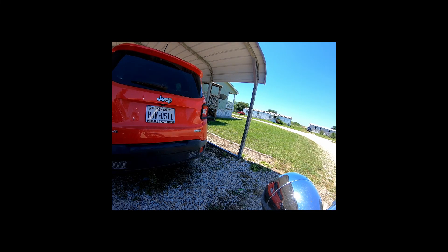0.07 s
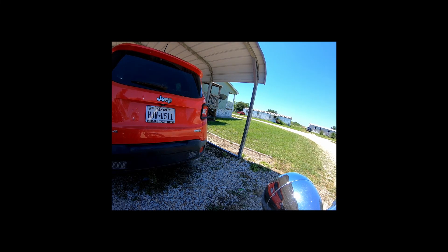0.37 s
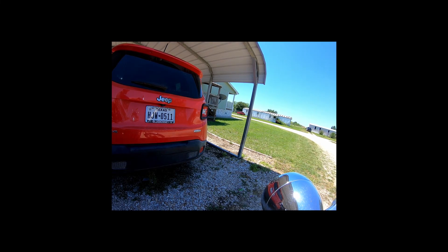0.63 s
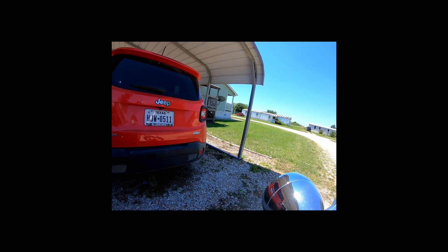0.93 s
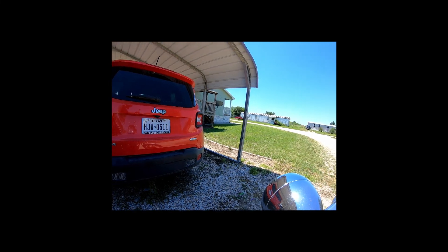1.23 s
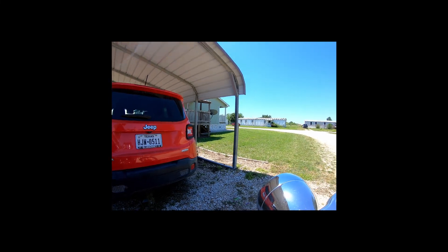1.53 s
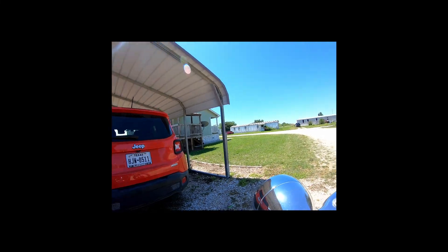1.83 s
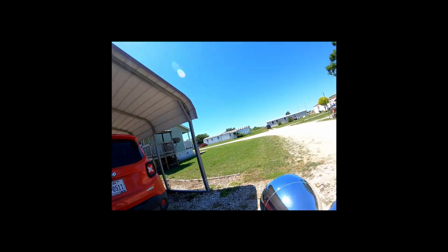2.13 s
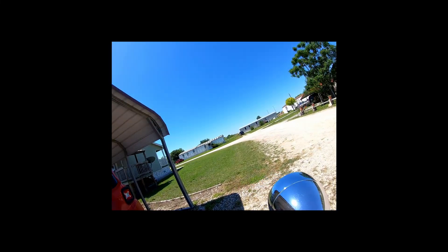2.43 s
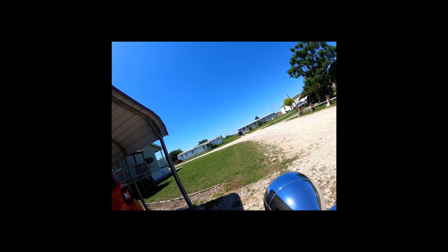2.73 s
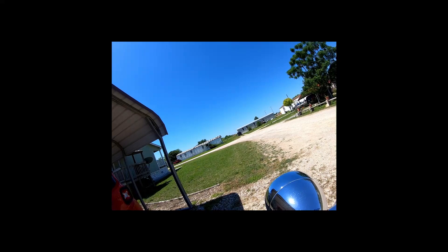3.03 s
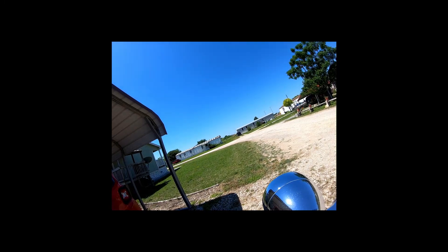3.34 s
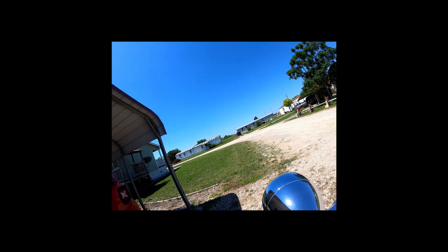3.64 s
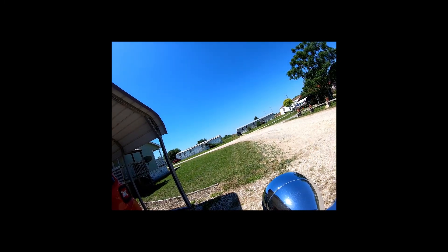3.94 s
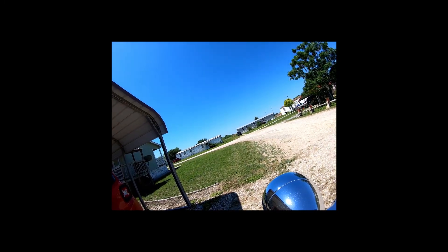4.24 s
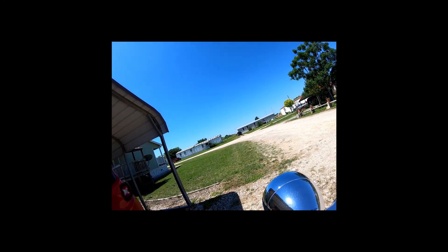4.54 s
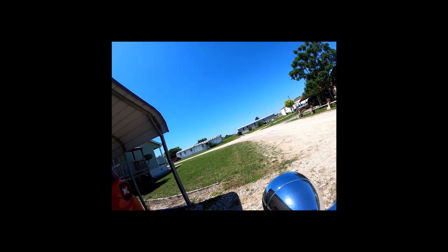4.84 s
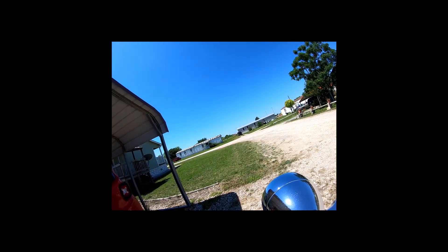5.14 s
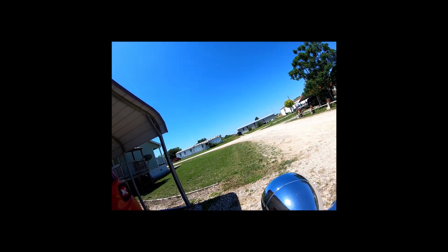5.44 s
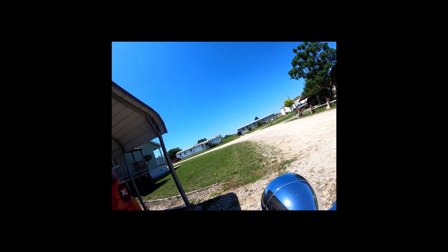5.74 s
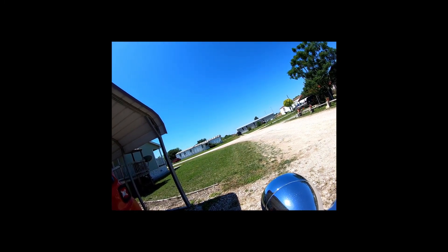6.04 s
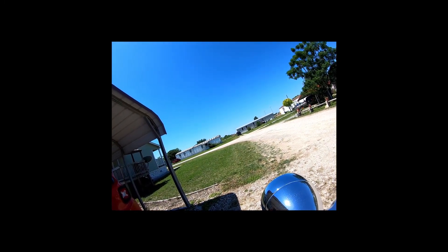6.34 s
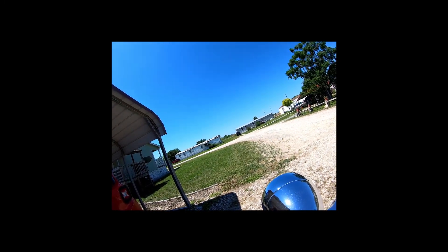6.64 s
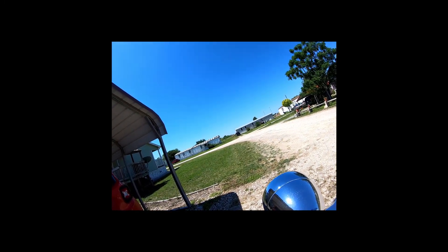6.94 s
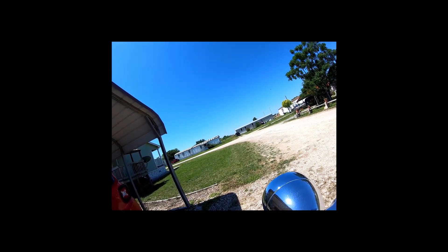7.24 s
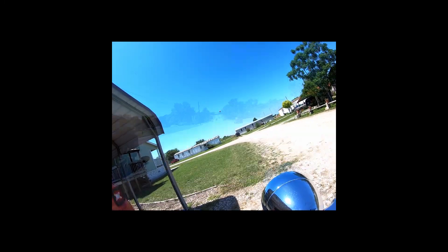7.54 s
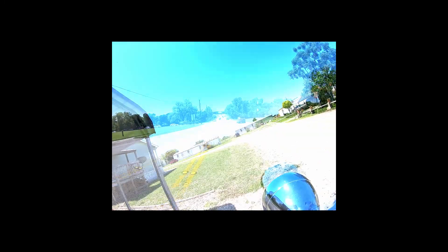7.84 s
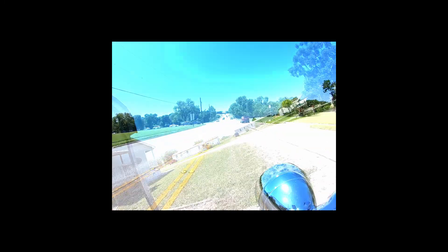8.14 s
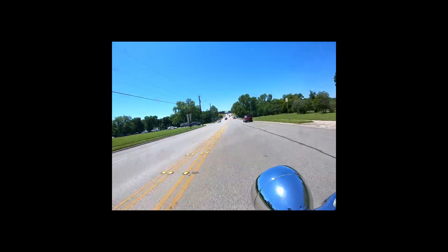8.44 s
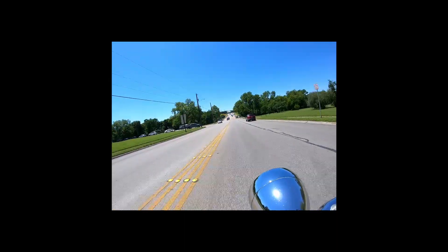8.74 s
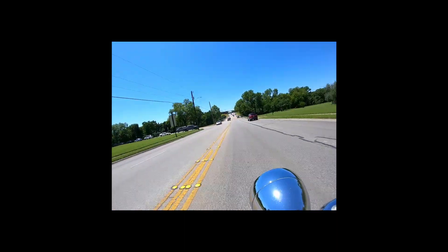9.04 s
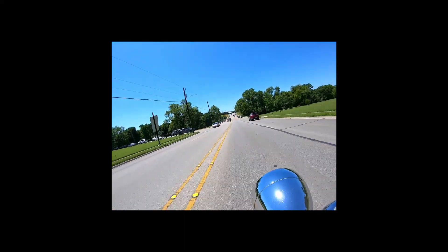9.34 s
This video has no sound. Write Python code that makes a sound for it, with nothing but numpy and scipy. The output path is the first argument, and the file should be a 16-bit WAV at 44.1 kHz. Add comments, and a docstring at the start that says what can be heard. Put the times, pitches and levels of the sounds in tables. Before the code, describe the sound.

Heard close from above the handlebar, a large motorcycle engine has just started and stumbles along with deep booms, soft chuffs and exhaust cracks, over clattering valves and small clanks. Two quick revs die back almost to a stall, then a third leads into a quicker idle. Near the end, the short carport reflections give way to the open road, where the engine drones evenly under rushing, gusting wind.

```python
"""A pop and a boom: a big V-twin motorcycle has just caught under a carport, its starter coasting down.
It lopes unevenly, nearly stalls, is blipped three times and takes up a fast idle. Each firing is a
boom that glides upward in the exhaust, a hollow thud in the muffler and, on a hard burn, a bark.
One microphone sits close, above the handlebar. At about 8 s the carport blends into the open road:
the same engine cruising, with wind on the microphone."""
import sys
import numpy as np
from scipy import signal
from scipy.fft import rfft, irfft, next_fast_len
from scipy.io import wavfile

SR = 44100
rng = np.random.default_rng(int(sys.argv[2]) if len(sys.argv) > 2 else 0)


def put_to_file(sound):
    """Save the sound as 16-bit audio at rate SR, in the file named by the first command-line argument."""
    columns = np.atleast_2d(sound).T  # one column per channel
    safe = np.clip(columns, -1, 1)
    whole_steps = np.round(safe * 32767)
    wavfile.write(sys.argv[1], SR, whole_steps.astype(np.int16))


N = 413658

# hard burns of the stumbling idle, blips and fast idle: (time [s], thud [dB], bark [dB], gas crack [dB])
POPS = [(.002, -22, -41, -29), (0.236, -34, -22, -32), (.336, -28, -21.5, -40), (0.396, -47, -15, -34.5),
        (.634, -29, -24.5, -39.5), (.866, -47, -20.5, -39.5), (0.9484, -23, -26, -38),
        (1.003, -26, -36, -49), (1.2766, -26, -22.5, -38.5), (1.342, -31, -21, -32.5),
        (1.59, -18.5, -21, -36), (1.759, -27, -40, -39.5), (1.832, -22, -19.5, -34.5),
        (1.915, -19.5, -25, -37), (1.989, -29.5, -36, -43.5), (2.2692, -20.5, -44, -38),
        (2.3367, -32, -30, -39.5), (2.494, -31.5, -25.5, -41.5), (2.5894, -20, -39, -40.5),
        (2.949, -26.5, -46, -41.5), (3.013, -28, -27, -34.5), (3.272, -18, -36, -35.5),
        (3.494, -24, -28, -38), (3.5854, -19, -33, -39), (3.652, -33.5, -47, -53), (3.933, -11, -23, -31),
        (4.061, -10.5, -21, -30), (4.113, -21, -21, -32), (4.33, -21.5, -51, -64), (4.5, -12, -12.5, -29.5),
        (4.5617, -9, -17, -28), (4.598, -10.5, -14.5, -28.5), (4.64, -9.5, -15, -33),
        (4.666, -21, -18, -34.5), (4.933, -13.5, -13.5, -29.5), (4.97, -10, -18, -33),
        (4.9933, -14, -12.5, -29.5), (5.0247, -11, -15, -33), (5.047, -16.5, -20, -33.5),
        (5.92, -23.5, -43, -31.5), (6.23, -23, -49, -40.5), (6.29, -29, -31, -40.5),
        (6.3704, -22, -60, -42.5), (6.526, -21.5, -37, -44.5), (6.584, -28, -30, -36),
        (6.666, -16.5, -30, -37.5), (6.721, -33, -24, -37), (6.7871, -15, -27, -34),
        (6.832, -14.5, -13.5, -31.5), (6.8806, -8.5, -18, -30), (6.9132, -18, -12, -32),
        (6.9521, -14, -25, -32), (7.263, -19, -27, -38), (7.301, -24, -20.5, -37),
        (7.342, -16.5, -30, -36.5), (7.376, -17.5, -19, -36.5), (7.4161, -15, -25, -34.5),
        (7.447, -15.5, -18, -38), (7.49, -19, -24, -38), (7.522, -20.5, -19, -34.5),
        (7.567, -13, -24.5, -36), (7.5991, -21.5, -17.5, -35.5), (7.643, -19, -32, -37),
        (7.679, -19.5, -22.5, -36.5), (7.722, -15.5, -30, -36), (7.76, -17, -22.5, -34.5),
        (7.8084, -20, -21, -35.5), (7.8445, -21, -19.5, -36), (7.891, -20.5, -22.5, -35.5),
        (7.928, -18.5, -21, -32.5), (7.978, -22.5, -22.5, -35)]
# soft chuffs of the loping idle: (time [s], boom [dB], thud [dB])
CHUFFS = [(.055, -14.5, -29), (0.184, -16, -22), (.48, -15.5, -40), (.548, -16, -48), (.7, -19, -34),
          (.785, -16.5, -45), (1.096, -17, -41), (1.182, -23, -44), (1.426, -20, -38), (1.493, -19.5, -34),
          (1.668, -18, -35), (2.073, -19, -31), (2.154, -21, -37), (2.422, -15.5, -29.5),
          (2.662, -17.5, -32.5), (2.748, -19.5, -33), (2.825, -25.5, -50), (3.1, -20.5, -32),
          (3.163, -17.5, -33), (3.345, -19, -40), (3.428, -19, -31.5), (3.738, -20, -35), (3.81, -29, -59),
          (4.001, -23, -43), (4.174, -16, -37), (4.228, -14, -28), (4.283, -17, -37), (4.392, -25, -32),
          (4.44, -17.5, -22), (5.982, -16, -30), (6.073, -22, -33), (6.148, -19, -25), (6.44, -18, -35)]
# even running: (time [s], engine speed [cycles/s], thud [dB], bark [dB], gas crack [dB])
BETWEEN_BLIPS = [(4.705, 15, -22, -40, -41.5), (4.91, 13, -25.5, -55, -46)]
RUN_DOWN = [(5.07, 23.6, -9.5, -27, -46), (5.12, 21.6, -33, -47, -42), (5.201, 22, -27, -47, -44),
            (5.299, 18.9, -27.5, -42, -45), (5.5, 15, -26, -46, -49), (5.601, 13.5, -33, -38, -48),
            (5.699, 12.3, -19, -50, -43.5), (5.88, 10.1, -31, -53, -59)]
AFTER_BLIP = [(6.99, 13, -27, -44, -41), (7.235, 12, -24.5, -56, -56)]
CRUISE = [(8.015, 15.5, -22, -40, -44), (8.1, 15.3, -24.5, -31.5, -45), (8.699, 16.8, -31, -34.5, -44),
          (9, 16.4, -26.5, -35, -42), (9.38, 16.1, -21, -41, -37.5)]
# added to the first cylinder, taken from the second: (boom [dB], thud [dB], bark [dB], gas crack [dB])
CYLINDER_CONTRAST = [0.81, 0.61, -2, -0.6]
# twist grip: (time [s], opening [0-1])
THROTTLE = [(0, 0.17), (3.9, 0.18), (4.45, 0.72), (4.6, 0.5), (4.72, 0.55), (4.88, 0.23), (5.03, 0.86),
            (5.1, 0.07), (5.6, 0.4), (6.6, 0.37), (6.9, 0.78), (7.9, 1), (8.3, 0.9)]
# strength of the pipe boom: (time [s], level [dB])
BOOM_LEVEL = [(0, -18), (1.2, -18), (2.3, -17.5), (3.7, -18.5), (4.6, -17), (5.03, -14.5), (5.1, -29),
              (5.48, -21), (5.7, -18.5), (6.2, -18.5), (6.8, -17), (7.4, -14.5), (8.0, -15.5),
              (8.25, -26.5), (9.38, -25)]
# strokes that whoop, climbing higher and swelling to their end: (time [s])
WHOOPS = [2.337, 3.013, 3.163, 3.345, 5.982]
# resonances of the bike's parts: (frequency [Hz], level [dB], t60 [s])
MUFFLER_MODES = [(180.4, 1, 0.051), (254.8, -1, 0.059), (275.7, 1, 0.076), (312, 1, 0.036),
                 (396, -8.5, 0.027)]
PIPE_MOUTH_MODES = [(430, -8, .016), (545, -6, .016), (616, -2, .018), (725, 4, .03), (810, 2, .026),
                    (930, -7, .014), (1100, -7, .03)]
FIN_MODES = [(1778, 7.5, 0.024), (1957, 0, .06), (2258, 2.5, 0.046), (2600, -6, 0.043), (2887, -4, 0.046),
             (3180, 0.5, .04), (3460, -6, 0.028)]
AIR_BOX_MODES = [(150.6, 2.5, 0.11), (248, 10.4, 0.031), (293.5, 1.2, 0.16)]
LEVER_MODES = [(2440, -1, 0.085), (3920, -10, 0.09), (4040, -1, 0.076), (5520, -12, 0.05),
               (7520, -19, 0.088)]
# noise colours of exhaust, machinery and wind: (frequency [Hz], relative density [dB])
RUMBLE_COLOUR = [(18, -6.5), (32, -11.5), (50, 8), (70, 9), (100, -14), (150, -30.5), (300, -49)]
BLAST_COLOUR = [(450, -4.5), (650, 7.5), (900, 1), (1150, -2), (1600, -24)]
GAS_COLOUR = [(250, 5), (450, 12.5), (800, 8.5), (1100, 1), (1450, -2.5), (2000, -0.5), (2900, -3.5),
              (4200, -11.5), (7000, -21), (11000, -29), (15000, -45)]
CLATTER_COLOUR = [(300, 2.5), (400, -11.5), (520, -5), (750, -4.5), (1000, -12), (1400, -13.5), (2000, -8),
                  (2800, -17), (4000, -31.5), (5500, -35), (8000, -41.5), (10500, -55.5), (12500, -62.5)]
WHIRR_COLOUR = [(1500, 9.5), (3000, -8), (4500, -4), (6000, -5.5), (7800, -6.5), (9000, -19), (11000, -17),
                (13000, -42.5)]
TICK_COLOUR = [(1000, -6), (2400, -4.5), (4200, -10.5), (8000, -16.5), (11000, -21), (15000, -41)]
BUFFET_COLOUR = [(15, -13.5), (28, 7.5), (50, 1.5), (100, 5), (200, 1.5), (300, -3), (450, -17), (800, -63)]
RUSH_COLOUR = [(250, 5), (500, -1.5), (800, -6), (1250, -11), (2000, -15), (3000, -16.5), (4200, -23.5),
               (5400, -28.5), (6300, -36), (8300, -37.5), (10300, -50.5), (11700, -73)]
# reflections from the ground, the parked car and the roof: (delay [s], relative level [dB])
ECHOES = [(.0047, -35), (0.0128, -10.5), (0.02, -21.5), (0.03, -25.5), (0.047, -9.5)]
# valve gear and primary drive: (time [s], low clatter [dB], high clatter [dB])
RATTLE = [(0.0, -22.5, -30), (0.71, -36.5, -45), (2.65, -37, -45), (2.72, -40.5, -48), (3.75, -35, -43.5),
          (3.9, -36, -44.5), (3.97, -37.5, -44.5), (4.52, -32, -41), (4.66, -29.5, -40.5),
          (5.08, -29, -37.5), (6.06, -38, -46.5), (6.62, -39.5, -48.5), (6.82, -26.5, -36.5),
          (7.29, -34.5, -44), (7.44, -29, -39), (8.0, -40.5, -58)]
# the starter spinning down: (time [s], pitch [Hz], whine [dB], whirr [dB])
STARTER = [(0, 4270, -49, -44), (.2, 4630, -56, -42.5), (.45, 4050, -61, -53), (.6, 3600, -60, -52),
           (.72, 3080, -60, -56), (.95, 2430, -57, -55.5), (1.2, 1870, -67, -79), (1.5, 1520, -100, -100)]
# hum of the primary chain: (time [s], pitch [Hz]) and (time [s], level [dB])
CHAIN_PITCH = [(.25, 475), (.42, 568.5), (.58, 496), (.81, 425), (.98, 560), (1.24, 450.5), (1.37, 558.5),
               (1.53, 425), (1.63, 548.5), (1.8, 415), (1.96, 556), (2.08, 491), (2.33, 515), (2.43, 471.5),
               (2.53, 520), (2.73, 483), (2.84, 410.5), (3.05, 575), (3.13, 498.5), (3.45, 466.5),
               (3.62, 613.5), (3.85, 469), (4, 593), (4.25, 605)]
CHAIN_LEVEL = [(0, -35.5), (.8, -41.5), (1.1, -44), (2.5, -40.5), (3.7, -43.5), (3.88, -57), (4.05, -37),
               (4.3, -46), (4.5, -93)]
# loose shields and brackets: (time [s], pitch [Hz], level [dB], t60 [s])
CLANKS = [(.044, 1960, -44, 0.068), (0.398, 2047, -23, 0.068), (0.867, 2560, -32, 0.058),
          (.885, 2290, -45.5, .45), (1.34, 2910, -33, .06), (1.592, 3500, -40, .06),
          (1.831, 2810, -29.5, 0.069), (1.915, 2455, -32, 0.093), (2.271, 1317, -38, .08),
          (2.398, 1960, -42, 0.13), (2.706, 2000, -45, 0.15), (2.911, 4030, -45, .12),
          (2.95, 1410, -40, 0.25), (2.953, 4000, -51, 0.17), (3.012, 3860, -46, .08),
          (3.046, 2540, -39, 0.11), (3.289, 2345, -36, 0.11), (5.927, 1600, -32, 0.15),
          (6.232, 2930, -44, .08), (6.245, 2096, -41, .08), (6.371, 2067, -40, .08),
          (6.726, 1790, -35, 0.076), (6.786, 3253, -41, .08), (6.833, 1765, -22, 0.064),
          (7.376, 1780, -23, 0.049), (7.68, 1732, -32, 0.073)]
# extra intake gulps as the throttle is nudged open: (time [s], level [dB])
GULPS = [(0.094, -22), (2.776, -20), (5.65, -17), (6.42, -26), (5.813, -14.5), (7.209, -11)]
# small metal contacts: (time [s], level [dB])
TICKS = [(2.537, -38), (2.753, -33), (2.773, -25.5), (2.821, -48), (2.869, -57), (2.923, -42), (2.953, -41),
         (2.991, -44), (3.053, -39), (3.101, -49), (3.15, -55), (3.802, -36), (3.819, -34), (6.207, -40)]
# gear whine: (time [s], pitch [Hz], level [dB])
GEARS = [(4.3, 1702, -77), (5.2, 1807, -47.5), (5.8, 1698, -57), (6.5, 1695, -54), (7.3, 1770, -50.5),
         (7.9, 1800, -77), (8.3, 1790, -68)]
# exhaust drone at speed: (time [s], level [dB])
DRONE_LEVEL = [(5.04, -38), (5.08, -15), (5.25, -15.5), (5.5, -18), (5.62, -19.5), (5.75, -34), (8.0, -38),
               (8.2, -23.5), (8.7, -23), (9.38, -22)]
# orders in the drone: (multiple of the engine cycle, throttle shut [dB], under load [dB])
DRONE_ORDERS = [(3, -16, -4), (4, -6, -7), (5, -2.5, 1), (6, -6.5, -4), (7, -7.5, 1.5), (8, -8, 0),
                (9, -10.5, -2), (10, -24, -10), (11, -17, -18), (12, -27, -4.5), (13, -15, -11),
                (14, -16.5, -10), (16, -21, -9)]
# pipe resonances that lift each order passing through: (frequency [Hz], half-width [Hz], lift [dB])
PIPE_PEAKS = [(85.4, 15, 5.5), (280, 34, 5.5)]
# riding wind at the microphone: (time [s], buffeting [dB], rush [dB])
WIND = [(0, -92.5, -96), (7.95, -71.5, -65.5), (8.0, -22, -30), (8.1, -23.5, -28), (8.26, -16, -25.5),
        (8.5, -23.5, -28), (8.75, -17, -24.5), (8.95, -19, -27), (9.15, -22.5, -28), (9.38, -21.5, -28.5)]

SECOND_CYLINDER = .428   # share of a cycle by which the second cylinder follows the first
CHUFF_BARK_DB, CHUFF_CRACK_DB = -51, -53
WHOOP_LIFT_HZ, WHOOP_SWELL_DB = 31.9, 4
BOOM_LAG_S = 0.0011   # the bass leaves the pipe just after the snap
LOAD_CLEARS_DB = 5   # an open throttle sweeps the tumbling gas out of the pipe
CARPORT_UNTIL_S, ROAD_FROM_S = 7.95, 8.25


def from_db(db):
    """Decibels to gain."""
    return 10 ** (np.asarray(db) / 20)


def unit_power(x):
    """Scale to an RMS of 1."""
    return x / np.sqrt(np.mean(x ** 2) + 1e-20)


def in_time(rows):
    """Each column of a curve at every sample."""
    s, *columns = np.transpose(rows)
    return [np.interp(np.arange(N) / SR, s, c) for c in columns]


def value_at(times, curve):
    """A two-column curve at the given times."""
    return np.interp(times, *np.transpose(curve))


def add(out, s, sound):
    """Mix a sound in at a time."""
    i = max(int(s * SR), 0)
    out[i:i + len(sound)] += sound[:max(N - i, 0)]


def butter(x, hz, kind):
    """Second-order low- or high-pass."""
    return signal.sosfilt(signal.butter(2, hz, kind, fs=SR, output="sos"), x)


def drift(rate_hz):
    """Slow random wander of spread 1."""
    return unit_power(butter(rng.standard_normal(N + SR), rate_hz, "low")[SR:])


def noise(colour):
    """Unit noise with a given spectrum, falling steeply beyond both ends."""
    hz, db = np.transpose(colour)
    size = next_fast_len(N)
    bins = np.maximum(np.arange(size // 2 + 1) * SR / size, 1)
    skirts = np.minimum(bins / hz[0], 1) ** 2 * np.minimum(hz[-1] / bins, 1) ** 20
    gain = from_db(np.interp(np.log(bins), np.log(hz), db)) * skirts
    return unit_power(irfft(rfft(rng.standard_normal(size)) * gain, size)[:N])


def strike(times, levels_db, modes, vary_db, detune):
    """Each blow rings all modes, with strengths and pitches of its own."""
    hz, db, t60 = np.transpose(modes)[:, :, None]
    out, t = np.zeros(N), np.arange(SR // 8) / SR
    dying = (-1) ** np.arange(len(hz))[:, None] * from_db(db - 60 * t / t60)
    for s, level_db in zip(times, levels_db):
        strength, pitch = rng.standard_normal((2, len(hz), 1))
        rings = dying * np.sin(2 * np.pi * hz * (1 + detune * pitch) * t)
        add(out, s, np.sum(from_db(level_db + vary_db * strength) * rings, axis=0))
    return out


def bursts(times, levels_db, rise, decay, tail_db, tail_decay):
    """Envelope of puffs that swell, die quickly and leave a faint tail; time constants in seconds."""
    power, t = np.zeros(N), np.arange(SR // 3) / SR
    attack = 1 - np.exp(-(t / rise) ** 2)
    release = np.exp(-t / decay) + from_db(tail_db) * np.exp(-t / tail_decay)
    for s, level_db in zip(times, levels_db):
        add(power, s, (from_db(level_db) * attack * release) ** 2)
    return np.sqrt(power)


def even_firings(curve, vary_db=2.6):
    """In even running the two cylinders fire once a cycle each, a short gap and then a long one."""
    s, speed, *levels = np.transpose(curve)
    t = np.arange(s[0], s[-1], 1 / SR)
    cycles = np.cumsum(np.interp(t, s, speed)) / SR
    cycle, cylinder = np.divmod(np.arange(2 * int(cycles[-1]) + 2), 2)
    marks = cycle + cylinder * SECOND_CYLINDER
    times = np.interp(marks, cycles, t)
    db = np.column_stack([value_at(times, BOOM_LEVEL)] + [np.interp(times, s, c) for c in levels])
    db = db + np.outer(1 - 2 * cylinder, CYLINDER_CONTRAST) + vary_db * rng.standard_normal(db.shape)
    return np.column_stack([times, db])[marks < cycles[-1]]


def all_firings():
    """Every firing in order: (time [s], boom [dB], thud [dB], bark [dB], gas crack [dB])."""
    runs = [even_firings(curve) for curve in (BETWEEN_BLIPS, RUN_DOWN, AFTER_BLIP, CRUISE)]
    pops = np.insert(POPS, 1, value_at(np.array(POPS)[:, 0], BOOM_LEVEL), axis=1)
    chuffs = [(*chuff, CHUFF_BARK_DB, CHUFF_CRACK_DB) for chuff in CHUFFS]
    firings = np.vstack([pops, chuffs] + runs)
    return firings[np.argsort(firings[:, 0])]


def snap(times, levels_db, start_hz=1133, end_hz=489, fall_s=0.0032, length_s=0.0056):
    """The front of each blast leaves the pipe treble first: a few cycles that fall in pitch."""
    out, t = np.zeros(N), np.arange(SR // 25) / SR
    for s, level_db in zip(times, levels_db):
        pitch, stretch = np.exp([0.081, .1] * rng.standard_normal(2))
        hz = (end_hz + (start_hz - end_hz) * np.exp(-t / fall_s)) * pitch
        swell = (1 - np.exp(-t / 0.0019)) * np.exp(-(t / (length_s * stretch)) ** 2)
        add(out, s, -from_db(level_db) * swell * np.sin(2 * np.pi * np.cumsum(hz) / SR))
    return out


def bark(times, bark_db):
    """Each blast snaps out of the pipe, rings its mouth and trails a puff of noise."""
    front = snap(times, bark_db + 6)
    ring = strike(times + 0.0011, bark_db - 4, PIPE_MOUTH_MODES, vary_db=3, detune=0.071)
    puff = bursts(times, bark_db - 5.5, rise=0.0014, decay=0.0021, tail_db=-16.5, tail_decay=0.013)
    return butter(front + ring + noise(BLAST_COLOUR) * puff, 1100, "low")


def boom(firings, open_hz=56.7, slow_top_hz=123.2, fast_top_hz=169.7, kick_hz=77.4, longest_s=0.1):
    """The pipe rings low while the cylinder is open to it and climbs as the piston sweeps up."""
    times, boom_db, thud_db = firings.T[:3]
    out, t = np.zeros(N), np.arange(SR // 5) / SR
    strokes = np.clip(np.diff(times, append=times[-1] + 0.024), .025, longest_s)
    hardness = np.interp(thud_db, [-36, -20], [0, 1])   # a weak burn swells in, a hard one kicks
    for s, level_db, stroke, hard in zip(times, boom_db, strokes, hardness):
        # a quick stroke on an open throttle climbs later and further, and ends cleanly
        drive = np.interp(stroke, [.045, .07], [1, 0]) * value_at(s, THROTTLE)
        slowness = (stroke / longest_s) ** 2
        whoop = np.min(np.abs(s - np.array(WHOOPS))) < .015
        chance = rng.standard_normal(3)
        wander = np.exp(0.039 * chance * slowness)   # slow strokes differ most
        top_hz = slow_top_hz + (fast_top_hz - slow_top_hz) * drive + WHOOP_LIFT_HZ * whoop
        low_hz, high_hz, length = [open_hz + 20 * drive, top_hz, stroke * (1 - 0.27 * whoop)] * wander
        swept = t / length
        climb = np.interp(swept, [0, 0.773 + .2 * whoop, 1.2, 2], [0.0048, 0.94, 0.98, 0.69])
        kick = kick_hz * (.5 + .5 * hard) * np.exp(-t / 0.0044)
        hz = low_hz + (high_hz - low_hz) * climb ** (1.284 + drive) + kick
        phase = 2 * np.pi * np.cumsum(hz) / SR
        tone = np.sin(phase) + from_db(-21.5 + 9.6 * drive) * np.sin(2 * phase)
        attack = 1 - np.exp(-t / (0.00088 + 0.0024 * (1 - hard)))
        body = np.exp(-(swept / (0.92 - 0.18 * drive)) ** 4)
        tail = from_db(-10.5 - 6.5 * drive) * np.exp(-swept / 5.3)
        # waves running back up the pipe make a slow boom lumpy
        lumps = 1 + 0.35 * slowness * np.sin(2 * np.pi * (27 * t + chance[0]))
        fade = 1 - (t / t[-1]) ** 2
        gain = from_db(level_db + WHOOP_SWELL_DB * whoop * np.minimum(swept, 1))
        add(out, s + BOOM_LAG_S, gain * attack * (body + tail) * lumps * fade * tone)
    return butter(from_db(4.5) * out, 31, "high")


def muffler_thud(times, thud_db):
    """Each pulse rings the hollow muffler."""
    rings = strike(times + 0.0015, thud_db + 5, MUFFLER_MODES, vary_db=2.5, detune=0.026)
    return butter(rings, 550, "low")


def rumble(times, levels_db):
    """A low rumble of gas swells and dies away after each firing."""
    db = levels_db - 0.5
    db[-1] -= 5.23   # the last one is softer
    swell = bursts(times, db, rise=0.008, decay=0.057, tail_db=-21.5, tail_decay=0.03)
    return noise(RUMBLE_COLOUR) * swell


def gas_crack(times, crack_db, cleared_db):
    """Gas tears out just after the snap and scatters, while the cooling fins ring."""
    fins = strike(times + 0.003, crack_db - 7.5, FIN_MODES, vary_db=6, detune=0.03)
    tear = bursts(times + 0.001, crack_db + 10.5, rise=.006, decay=.0056, tail_db=-10.5, tail_decay=.03)
    scatter_db = crack_db - 3 - 1.5 * cleared_db
    scatter = bursts(times, scatter_db, rise=0.01, decay=0.03, tail_db=-4, tail_decay=0.11)
    return noise(GAS_COLOUR) * (tear + scatter) + fins


def carport(x):
    """Hard surfaces near the microphone answer each sound, more faintly once out on the road."""
    echo = np.zeros(N)
    for delay, db in ECHOES:
        add(echo, delay, from_db(db) * x)
    echo_gain, = in_time([(CARPORT_UNTIL_S, 0.64), (ROAD_FROM_S, 0.22)])
    return x + echo * echo_gain


def exhaust(firings):
    """The lows of each firing reach the microphone direct; bark and crack come with reflections."""
    times, boom_db, thud_db, bark_db, crack_db = firings.T
    cleared_db = LOAD_CLEARS_DB * value_at(times, THROTTLE)
    lows = boom(firings) + rumble(times, boom_db - cleared_db) + muffler_thud(times, thud_db)
    return lows + carport(bark(times, bark_db) + gas_crack(times, crack_db, cleared_db))


def valve_rattle(times):
    """Valve gear and chain rattle on, surging slightly with each firing and receding on the road."""
    low_db, high_db = in_time(RATTLE)
    surge = bursts(times, np.zeros(len(times)), rise=0.038, decay=0.0067, tail_db=-26, tail_decay=0.036)
    clatter = noise(CLATTER_COLOUR)
    low = unit_power(butter(butter(clatter, 220, "high"), 1640, "low"))
    low *= from_db(low_db + 3.5 + 2.37 * drift(26))
    high = unit_power(butter(clatter, 1530, "high")) * from_db(high_db + 6 + 0.4 * drift(50))
    presence, = in_time([(CARPORT_UNTIL_S, 0.62), (ROAD_FROM_S, 0.078)])
    return (low + high) * (0.77 + 0.068 * surge) * presence


def rough_tone(hz, rough, rate_hz):
    """A sine whose pitch jitters by the share `rough`."""
    return np.sin(2 * np.pi * np.cumsum(hz * (1 + rough * drift(rate_hz))) / SR)


def starter():
    """The released starter coasts to rest with a falling whine and a fading whirr."""
    hz, whine_db, whirr_db = in_time(STARTER)
    whine = rough_tone(hz, rough=0.015, rate_hz=150) * from_db(whine_db + 2.3 * drift(16))
    return whine + noise(WHIRR_COLOUR) * from_db(whirr_db)


def chain():
    """The primary chain growls through the loping idle, its pitch rising and sagging."""
    hz, = in_time(CHAIN_PITCH)
    db, = in_time(CHAIN_LEVEL)
    links = .6 + .8 * drift(45)
    return rough_tone(hz, rough=.07, rate_hz=110) * links * from_db(db + 1.5)


def clanks(spread=0.013):
    """Each loose part rings briefly on three close partials and buzzes against its mount."""
    out, t = np.zeros(N), np.arange(SR // 3) / SR
    attack = 1 - np.exp(-t / 0.0026)
    for s, hz, level_db, t60 in CLANKS:
        pitches = hz * (1 + spread * np.array([[0], [-1], [1]]) * rng.uniform(0.4, 1.5, (3, 1)))
        ring = np.array([1, .5, .5]) @ np.sin(2 * np.pi * (pitches * t + rng.random((3, 1))))
        add(out, s, from_db(level_db + 3.5 - 60 * t / t60) * attack * ring)
    buzz = .7 + .55 * drift(220)
    return out * buzz


def intake(firings, slow_stroke_s=0.056, delay_s=0.048):
    """Air drawn in after a slow stroke, or by a sudden throttle, sets the air box ringing."""
    slow = firings[:-1][np.diff(firings[:, 0]) > slow_stroke_s]
    fired, _, thud_db = slow.T[:3]
    drawn = np.column_stack([fired + delay_s, np.minimum(thud_db + 3.5, -17)])
    times, levels_db = np.vstack([drawn, GULPS]).T
    rings = strike(times, levels_db, AIR_BOX_MODES, vary_db=1.5, detune=.025)
    return from_db(-3.5) * butter(rings, 920, "low")


def ticks(jingle_until_s=3.5):
    """Short bright metal contacts; the earlier ones leave a lever jingling."""
    times, levels_db = np.transpose(TICKS)
    taps = bursts(times, levels_db - 6, rise=0.0011, decay=0.0069, tail_db=-22.5, tail_decay=0.02)
    contact = noise(TICK_COLOUR) * taps
    jingle_db = np.minimum(levels_db, -40) - 8.5
    jingle = strike(times[times < jingle_until_s], jingle_db, LEVER_MODES, vary_db=10, detune=0.0097)
    return contact + jingle


def gears():
    """The gears whine roughly through the blips and the fast idle."""
    hz, db = in_time(GEARS)
    return rough_tone(hz, rough=0.074, rate_hz=160) * from_db(db + 3.6 * drift(30))


def drone(curve, loaded, waver_db, flutter, fade_s=.04):
    """Quick firings run together in the pipe as clean orders that follow the crank."""
    speed = in_time(curve)[0]
    start, end = curve[0][0], curve[-1][0]
    running, = in_time([(start - fade_s, 0), (start, 1), (end, 1), (end + fade_s, 0)])
    cycles = np.cumsum(speed * (1 + flutter * drift(13))) / SR
    out = np.zeros(N)
    for order, shut_db, load_db in DRONE_ORDERS:
        lift_db = sum(db / (1 + ((order * speed - hz) / width) ** 2) for hz, width, db in PIPE_PEAKS)
        gain = from_db((load_db if loaded else shut_db) + lift_db - 3 + waver_db * drift(10.2))
        out += gain * np.sin(2 * np.pi * (order * cycles + rng.random()))
    return np.sqrt(2) * out * running * from_db(in_time(DRONE_LEVEL)[0])


def wind(gust_hz=20):
    """Lumpy buffeting right on the microphone, under a smoother rush of air and tyres."""
    buffet_db, rush_db = in_time(WIND)
    gust = drift(gust_hz)
    buffet = noise(BUFFET_COLOUR) * from_db(buffet_db + 1.4 * gust + 2 * drift(67))
    rush = noise(RUSH_COLOUR) * from_db(rush_db + 0.97 * gust + 1.2 * drift(69))
    return buffet + rush


def scene():
    """Engine and wind, close up, at one microphone above the handlebar."""
    firings = all_firings()
    drones = drone(RUN_DOWN, loaded=False, waver_db=3, flutter=0.0037)
    drones += drone(CRUISE, loaded=True, waver_db=2, flutter=0.0014)
    metal = ticks() + clanks() + carport(valve_rattle(firings[:, 0]))
    engine = exhaust(firings) + drones + intake(firings) + metal + starter() + gears() + chain()
    return (engine + wind())[None]


def record(dry):
    """The microphone sheds the deepest bass, rounds the peaks and cuts the top."""
    ceiling, stop_hz = .95, 15700
    rounded = ceiling * np.tanh(butter(dry, 18, "high") / ceiling)
    return signal.sosfilt(signal.cheby2(12, 70, stop_hz, fs=SR, output="sos"), rounded)


dry = scene()
out = record(dry)
put_to_file(out)
```